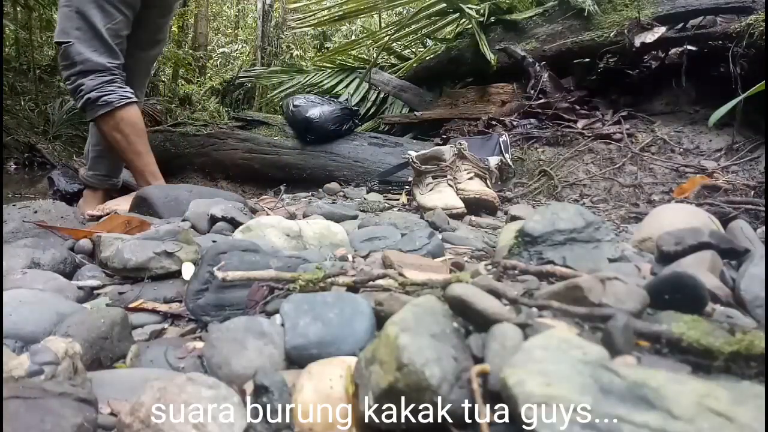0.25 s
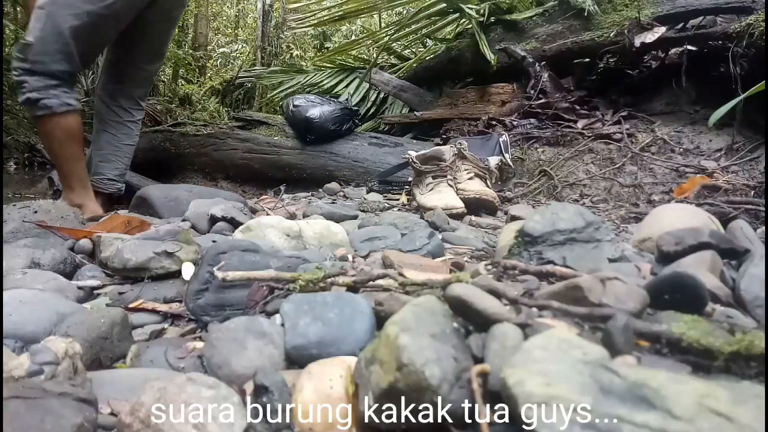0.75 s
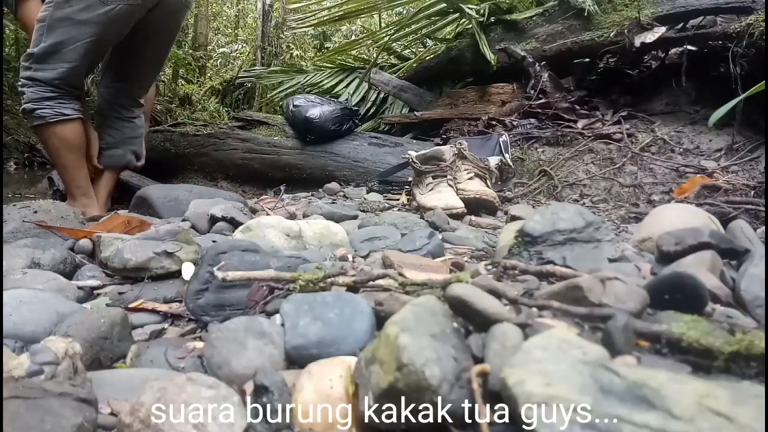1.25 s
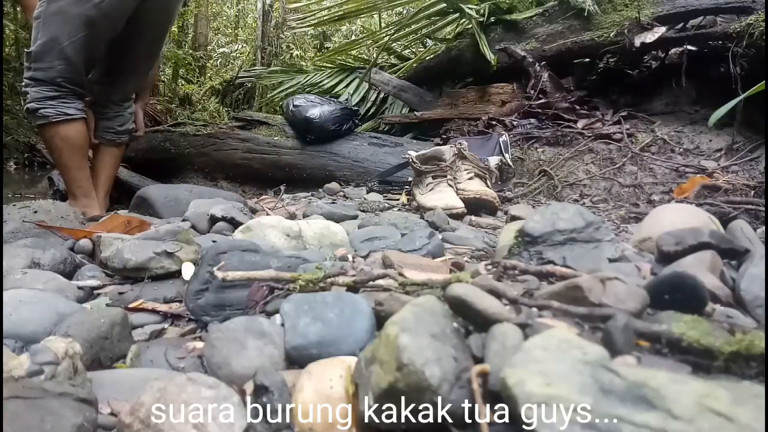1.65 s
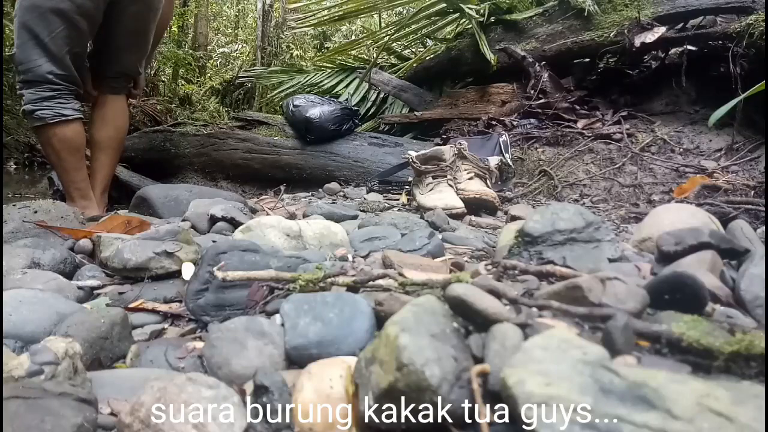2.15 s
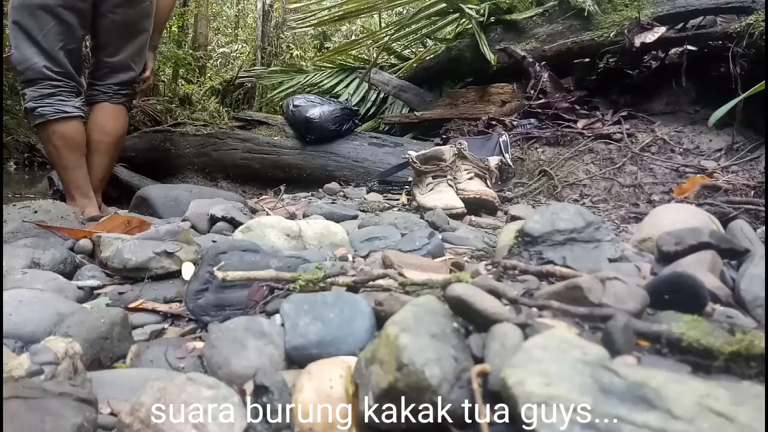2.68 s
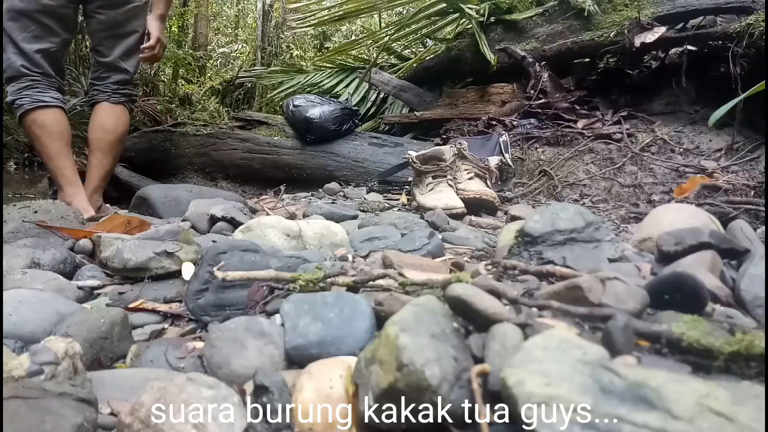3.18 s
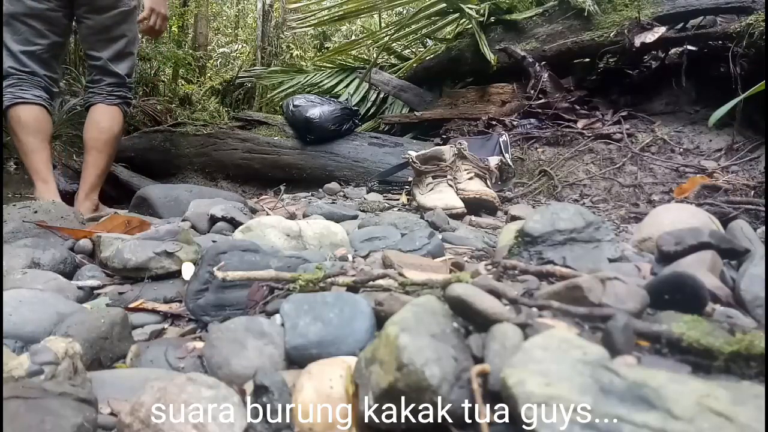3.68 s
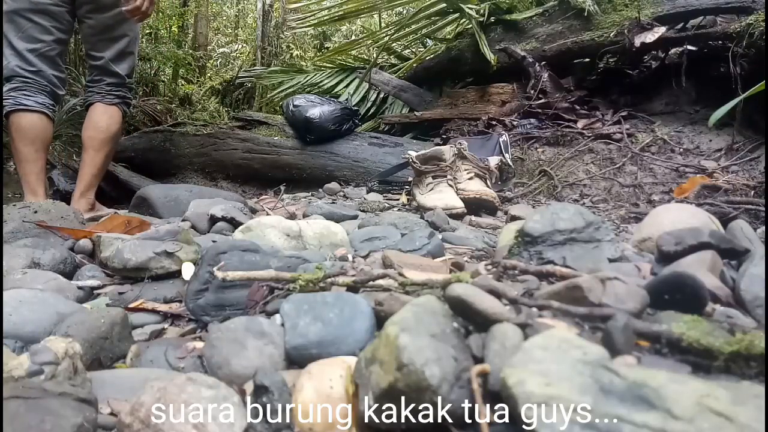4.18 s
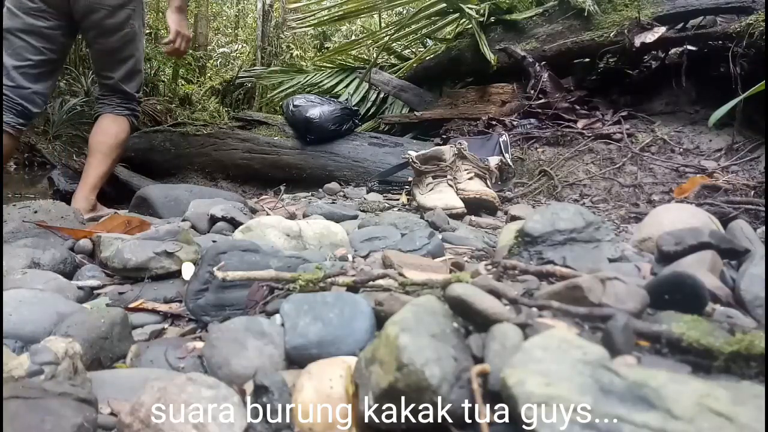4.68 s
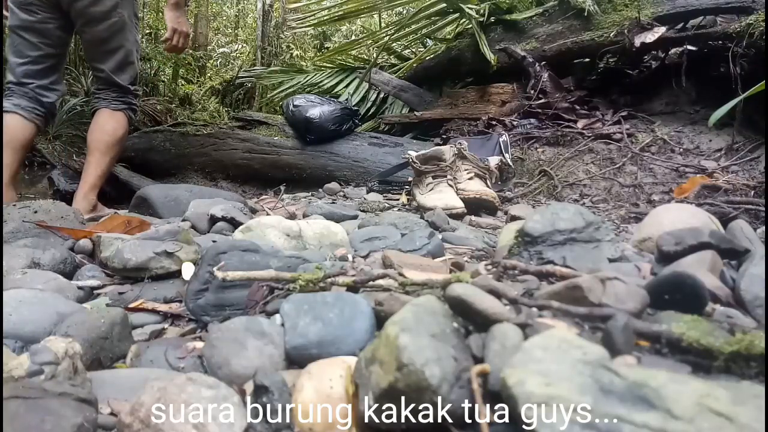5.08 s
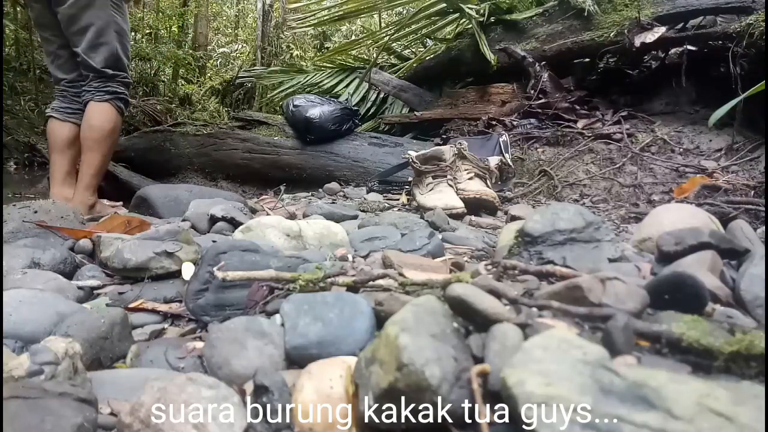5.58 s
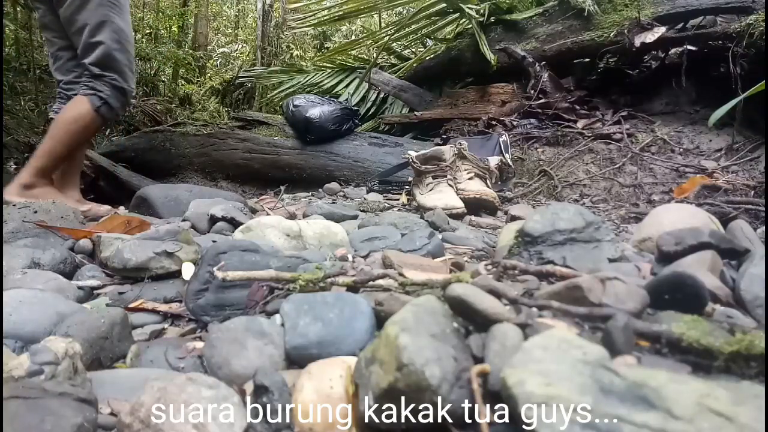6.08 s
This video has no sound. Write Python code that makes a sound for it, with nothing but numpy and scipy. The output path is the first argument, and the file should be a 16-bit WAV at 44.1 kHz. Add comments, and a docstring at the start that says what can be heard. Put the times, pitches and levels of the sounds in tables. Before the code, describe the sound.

A cockatoo screeches harshly three times in an echoing rain forest while feet stir shallow water among stones and insects whine.

```python
"""A cockatoo screeches high in a rain forest: pitched, roughened pulses and noise puffs pass a throat filter.
A second bird rasps once, uneven clicks through resonances; trunk echoes draw both birds out into a tail.
Feet stir a shallow brook among stones: rising bubble tones, a trickle of small ones, noise splashes.
Three kinds of insects whine as wing strokes and noise ring resonances, over soft noise of water and leaves.
Two microphone ports hear it, the left one louder over most of the spectrum."""
import sys
import numpy as np
from scipy import signal
from scipy.fft import rfft, irfft, next_fast_len
from scipy.io import wavfile
from scipy.ndimage import uniform_filter1d

SR = 44100
rng = np.random.default_rng(int(sys.argv[2]) if len(sys.argv) > 2 else 0)


def pcm_store(signal):
    """Save signal as 16-bit PCM."""
    levels = np.round(np.clip(np.atleast_2d(signal), -1, 1) * 32767)
    wavfile.write(sys.argv[1], SR, levels.astype(np.int16).T)


N = 279594
LEAD_S = 1  # sound before time zero, whose tail still rings
M = N + LEAD_S * SR
TIME_S = np.arange(M) / SR - LEAD_S


def amp(db):
    """Decibels to gain."""
    return 10 ** (np.asarray(db) / 20)


def evened(x):
    """Scales to rms 1."""
    return x / np.sqrt(np.mean(x ** 2) + 1e-20)


def read(points, hz):
    """Interpolates (Hz, value) points on a log-frequency axis."""
    f, value = np.transpose(points)
    return np.interp(np.log(hz + 1), np.log(f + 1), value)


def colour(x, points):
    """Filters by a spectrum of (Hz, dB) points."""
    size = next_fast_len(x.shape[-1] + 2048)
    gain = amp(read(points, np.fft.rfftfreq(size, 1 / SR)))
    return irfft(rfft(x, size) * gain, size)[..., :x.shape[-1]]


def add(mix, start_s, sound):
    """Mixes a sound in at start_s."""
    part = mix[..., round((start_s + LEAD_S) * SR):][..., :sound.shape[-1]]
    part += sound[..., :part.shape[-1]]


def resonate(x, hz, width_hz):
    """Two equal resonances in a row."""
    b, a = signal.iirpeak(hz, hz / width_hz, SR)
    return signal.lfilter(b, a, signal.lfilter(b, a, x))


def wander(length, span):
    """Smoothed noise of rms 1 that changes over span samples."""
    return evened(uniform_filter1d(rng.standard_normal(length), int(span)))


def stretches_db(rows, rise_db_s, fall_db_s, rest_db):
    """Level in dB that rises, holds and falls back to rest; rows are (start s, length s, dB)."""
    levels = []
    for start_s, length_s, db in rows:
        rise = rise_db_s * np.maximum(start_s - TIME_S, 0)
        fall = fall_db_s * np.maximum(TIME_S - start_s - length_s, 0)
        levels.append(db - rise - fall)
    return np.maximum(np.max(levels, axis=0), rest_db)


def forest(x, fill_s, shorten=1):
    """Echoes from many trunks, other ones at each port; they fill in, then die by band."""
    # Each row: frequency in Hz, basic t60 in s, ahead of shorten and the extra far fade.
    decay = [(500, 1.0), (900, 1.5), (1600, 1.7), (2400, 1.95), (3200, 2.1), (4000, 2.17), (7000, 2.32),
             (12000, 0.18)]
    hz, t, z = signal.stft(rng.standard_normal((2, 2 * SR)), SR, nperseg=256)
    shape = (1 - np.exp(-t / fill_s)) * amp(-60 * t / (shorten * read(decay, hz)[:, None]))
    shape *= amp(-8.0 * t ** 2 + 1.8 * wander(len(t), 14))  # far trunks fade sooner and stand in clumps
    tail = signal.istft(z * shape, SR, nperseg=256)[1]
    return signal.fftconvolve(x[None], tail / np.linalg.norm(tail[0]), axes=1)[:, :M]


def air():
    """Distant water and leaves: soft coloured noise, partly shared by the ports, that swells a little."""
    # Spectrum of water and leaves. Each row: frequency in Hz, relative density in dB per Hz.
    air_spectrum = [(20, -24), (50, -11), (110, -8), (300, -7), (600, -12), (1300, -10), (2200, -17.5),
                    (3500, -22), (4400, -6.5), (6300, -6.5), (7200, -20.5), (8600, -41.5), (10500, -40),
                    (15500, -36)]
    a, b, shared = rng.standard_normal((3, M))
    noise = evened(colour(np.array([a, b]) + .5 * shared, air_spectrum))
    return amp(-66.5 + 1.0 * wander(M, 4500)) * noise


def insects():
    """Wing strokes ring one resonance: regular for a near singer, a blur of noise for a crowd."""
    # Each row: resonance in Hz, its width in Hz, mean strokes per second,
    # steadiness (1 one regular singer, 0 a crowd).
    kinds = [(5087, 120, 91, 0.77), (5586, 400, 180, 0.11), (7876, 200, 35, 0.17)]
    # Stretches at fuller level, one list for each of the low, main and high whine.
    # Each row: start in s, length in s, level in dB.
    stretches = [
        [(.4, 1.05, -61.5)],
        [(-1, 2.3, -62.5), (2.2, 1.5, -60.5), (4.4, 1.6, -62)],
        [(-1, 1.43, -72), (2.2, 1.15, -73.5), (5.05, .75, -76)],
    ]
    # Per whine: rise in dB/s; fall in dB/s; level between stretches in dB.
    rise_db_s = (300, 30, 40)
    fall_db_s = (25, 40, 60)
    rest_db = (-85, -68, -84)
    levels = map(stretches_db, stretches, rise_db_s, fall_db_s, rest_db)
    out = np.zeros((2, M))
    for (hz, width_hz, rate_hz, steady), level_db in zip(kinds, levels):
        turns = np.cumsum(rate_hz * (1 + 0.01 * wander(M, 4000))) / SR
        strokes = np.diff(np.floor(turns), prepend=0)
        a, b, shared = rng.standard_normal((3, M))
        singer = evened(resonate(strokes, hz, width_hz))
        crowd = evened(resonate(np.array([a, b]) + 0.39 * shared, hz, width_hz))
        whine = evened(steady * singer + (1 - steady) * crowd)
        out += whine * amp(level_db + 0.55 * wander(M, 2000))
    return out


def bubble(hz, length_s, rise_per_s, smack=0):
    """A tone that swells, dies, and rises as the bubble nears the surface; the water smacks around it."""
    t = np.arange(0, length_s, 1 / SR)
    shape = (t / length_s) ** 1.5 * amp(-95 * t / length_s)
    tone = np.sin(2 * np.pi * hz * (t + rise_per_s * t ** 2 / 2))
    noise = rng.standard_normal(len(t))
    for _ in range(2):
        noise = resonate(noise, 1.15 * hz, .9 * hz)
    return (tone + smack * evened(noise)) * shape / shape.max()


def large_bubbles():
    """Single bubbles, each placed between the ports by level."""
    # Each row: moment during the swell in s, level in dB, opening pitch in Hz,
    # left-right tilt in dB ahead of a common shift, length in s.
    bubbles = [(.2004, -43.5, 1300, -7, .087), (.259, -62, 480, 8, .2), (.4369, -49.5, 1470, 4, .064),
               (.5596, -55, 1250, 3.5, .071), (.6958, -58, 1150, -11, .076), (.8689, -62, 1194, 9, .055),
               (1.058, -62, 1052, 0, .12), (1.0999, -56, 1058, -2, .08), (1.1328, -59, 1100, 0, .1),
               (1.1742, -49, 997, -8, .048), (1.2126, -59, 1000, 5, .07), (1.703, -38, 815, 8, .06),
               (1.704, -31.5, 1640, 13, .059), (1.939, -55, 1390, 15, .087), (2.139, -43, 885, 1.5, .072),
               (2.687, -53, 1234, 1.5, .16), (3.332, -62.5, 1245, 13, .066), (3.98, -24.5, 826, 2.5, .029),
               (4.034, -39.5, 609, 6, .045), (4.089, -36, 551, 10.5, .065), (4.1006, -27.5, 1626, 9, .04),
               (4.46, -44.5, 1129, 7.5, .051), (4.785, -37, 943, 4.5, .069), (4.7965, -33, 1900, 8, .022),
               (4.819, -53, 1380, 9, .091), (4.902, -51, 1343, 12, .054), (4.998, -49, 700, 8, .025),
               (4.999, -47, 1960, 15, .028), (5.004, -44.5, 1271, 8.5, .043), (5.122, -39.5, 1030, 3, .089),
               (5.13, -28, 530, -3, .04), (5.151, -45, 978, 15, .04), (5.174, -43.5, 489, -5, .084),
               (5.187, -35, 854, 4, .035), (5.214, -37.5, 686, 7, .049), (5.227, -42, 1035, 14, .028),
               (5.265, -37.5, 1037, 5, .045), (5.29, -44, 1400, 8, .07), (5.297, -34, 1210, 12, .035),
               (5.341, -46.5, 838, 12, .1), (5.375, -51, 895, 5, .086), (5.448, -43, 1143, -12, .061),
               (5.452, -48, 1700, 8, .03), (5.464, -40, 1128, 14, .04), (5.514, -38.5, 605, -2.5, .14),
               (5.534, -43, 1200, 0, .077), (5.577, -54.5, 1410, 14.5, .049), (5.633, -60, 1282, 12, .07),
               (5.727, -36, 546.5, 1.5, .062), (5.9, -57, 1130, 8, .07), (5.936, -52, 1080, -2.5, .1)]
    pitch_climb = .17  # share of the opening pitch, over the whole length
    mix = np.zeros((2, M))
    for s, db, hz, pan_db, length_s in bubbles:
        side_db = (pan_db - 1.0) / 2  # the ports add their own tilt
        gains = amp(db + np.array([[side_db], [-side_db]]))
        add(mix, s - 0.054 * length_s, gains * bubble(hz, length_s, pitch_climb / length_s, smack=0.4))
    return mix


def trickle():
    """Many small bubbles at random moments, stirred up by feet."""
    # Each row: start in s, length in s, level in dB.
    stirs = [(1.06, .25, -75), (2.25, .2, -67), (4.78, .3, -64), (5.13, .36, -52), (6.05, .3, -54)]
    small = np.zeros((2, M))
    for hz in np.geomspace(550, 2600, num=30):
        train = (rng.random(M) < 25 / SR) * amp(3 * np.minimum(rng.exponential(1, M), 4))
        left = rng.uniform(0.16, 0.77)
        sound = signal.oaconvolve(train, bubble(hz, 35 / hz, 8.5))[:M]
        small += np.array([[left], [1.2 - left]]) * sound
    return evened(small) * amp(stretches_db(stirs, rise_db_s=250, fall_db_s=170, rest_db=-83))


def splashes():
    """Fine spray: coloured noise bursts that rise fast and die exponentially."""
    # Each row: start in s, gain in dB.
    bursts = [(2.1926, -59), (4.68, -57), (4.8711, -66), (4.9987, -58), (5.2992, -71), (5.3866, -65),
              (5.454, -66)]
    # Spectrum of the spray. Each row: frequency in Hz, gain in dB.
    spray = [(400, -31), (1200, 10), (3000, 21), (8000, 6.5), (11500, -9.5), (14500, -6), (16000, 7)]
    t60_s, rise_s = .22, .009
    mix = np.zeros((2, M))
    t = np.arange(SR // 3) / SR
    for s, db in bursts:
        a, b, shared = rng.standard_normal((3, len(t))) * amp(1.8 * wander(len(t), 43))
        drops = colour(0.91 * np.array([a, b]) + shared, spray)
        add(mix, s, drops * amp(db - 60 * t / t60_s) * (1 - np.exp(-t / rise_s)))
    return mix


def brook():
    """Bubbles, trickle and spray, with a short echo off the banks."""
    mix = large_bubbles() + trickle() + splashes()
    return mix + amp(-9.5) * forest(mix.mean(0), fill_s=.004, shorten=.12)


def rasp():
    """A toneless call: uneven clicks ring a throat."""
    # Throat resonances. Each row: frequency in Hz, width in Hz, relative level in dB.
    resonances = [(3330, 500, -4), (3720, 600, -2.5), (4380, 280, -3), (6860, 810, -15.5), (9500, 620, -33)]
    full_s, hold_s, full_db = 1.99, .07, -42
    clicks = (rng.random(M) < 2500 / SR) * rng.standard_normal(M)
    throat = sum(amp(db) * evened(resonate(clicks, hz, width_hz)) for hz, width_hz, db in resonances)
    level_db = stretches_db([(full_s, hold_s, full_db)], rise_db_s=120, fall_db_s=150, rest_db=-np.inf)
    return throat * amp(level_db)


def screech(start_s, length_s, base_db, open_hz, dip_hz, steady_hz, steady_s, swell_s,
            open_rough, steady_rough, pulsing):
    """Jittered pulses of the syrinx, alternately strong and weak, with puffs of noise, pass the throat."""
    # Bird's throat and the air on the way. Each row: frequency in Hz, gain in dB.
    throat_gains = [(550, -43), (780, -20.5), (1000, -20), (1600, -18), (2050, -11.5), (2390, 1),
                    (2700, -6), (3150, -5.5), (4000, -13.5), (4800, -20), (6500, -32), (8000, -40),
                    (10500, -89.5), (16000, -110)]
    chirp_s = .022  # the opening pitch holds, then moves to the dip
    onset_db, push_db = -15, 2.2  # effort change at the start, at mid-call
    break_s, release_s, release_db = .08, .04, -25  # the voice breaks up, then stops
    end_sag = .02  # share of pitch lost at the end
    t = np.arange(0, length_s, 1 / SR)
    ending = np.clip(1 - (length_s - release_s - t) / break_s, 0, 1)

    effort_db = base_db + onset_db * np.clip(1 - t / swell_s, 0, 1) ** 2
    effort_db += release_db * np.clip(1 - (length_s - t) / release_s, 0, 1)
    effort_db += push_db * np.sin(np.pi * t / length_s) ** 4

    chirp = np.clip(1 - (t / chirp_s) ** 2, 0, 1)
    glide = np.sin(np.pi / 2 * np.clip((t - chirp_s) / (steady_s - chirp_s), 0, 1))
    hz = dip_hz + (open_hz - dip_hz) * chirp + (steady_hz - dip_hz) * glide
    hz *= 1 - end_sag * ending

    glide_rough = max(open_rough, steady_rough + .13)
    rough = np.interp(t, [chirp_s, 2 * chirp_s, steady_s], [open_rough, glide_rough, steady_rough])
    rough = np.clip(rough + .17 * ending, 0, 1)

    drift = .04 * rough ** 2 * wander(len(t), 120) + .0015 * wander(len(t), 1200)
    turns = np.cumsum(hz * (1 + drift)) / SR
    turns += (.008 + .025 * rough) * wander(len(t), 130)  # each pulse comes a little early or late
    sharp = np.clip(1.18 + 0.036 * (effort_db + 24.5), .4, .97)  # harder effort, more treble
    pulses = sum(sharp ** k * np.cos(2 * np.pi * k * turns) for k in range(1, 12)) / sharp ** 3 / 2
    pulses *= 1 + pulsing * np.cos(np.pi * turns)
    puffs = evened((.4 + np.exp(-(turns % 1) / 0.9)) * rng.standard_normal(len(t))) * sharp ** 2.8
    envelope = amp(effort_db + 1.5 * wander(len(t), 700)) * signal.windows.tukey(len(t), .02)
    drive = np.pad(envelope * ((1 - rough) * pulses + 2.44 * rough * puffs), 200)
    return start_s - 200 / SR, amp(5.5) * colour(drive, throat_gains)


def birds():
    """Both birds, straight and by way of the forest."""
    # Each row: start in s, length in s, base effort in dB, opening, dip and steady pitch in Hz,
    # time to steady pitch in s, swell in s, opening and steady roughness (0-1), strong-weak pulsing (0-1).
    screeches = [(-.86, .42, -24, 900, 720, 796, .14, .2, .05, .2, .15),
                 (1.399, .38, -27, 895, 705, 795, .17, .055, .3, .28, .15),
                 (3.824, .335, -28.3, 955, 712, 798, .115, .06, .25, .27, .22),
                 (5.989, .5, -27.5, 833, 845, 762, .27, .17, .7, .5, .5)]
    calls = rasp()
    for row in screeches:
        add(calls, *screech(*row))
    return amp(4.2) * calls + amp(3.0) * forest(calls, fill_s=0.007)


def scene():
    """Everything at the two ports, from time zero on."""
    return (birds() + brook() + insects() + air())[:, -N:]


def record(dry):
    """Spaced ports of unlike sensitivity; a share of the squared sound joins in; then the band limit."""
    # Port sensitivity. Each row: frequency in Hz, left-right difference in dB.
    ports = [(60, 8.5), (250, 6), (550, 8), (1100, 5), (2400, 8), (5000, 9.5), (8000, -1), (13000, 5)]
    lag_s = .00033  # sound reaches the left port later
    bend, edge_hz = .05, 15450  # share of the squared sound; low-pass edge
    highpass = signal.butter(2, 20, "high", fs=SR, output="sos")
    dry = dry + bend * signal.sosfilt(highpass, dry ** 2)
    late = np.pad(dry[0], (round(lag_s * SR), 0))[:N]
    left = colour(late, [(hz, db / 2) for hz, db in ports])
    right = colour(dry[1], [(hz, -db / 2) for hz, db in ports])
    taps = signal.firwin(511, edge_hz, window=("kaiser", 9), fs=SR)
    return signal.oaconvolve(np.array([left, right]), taps[None], "same")


dry = scene()
out = record(dry)
pcm_store(out)
```